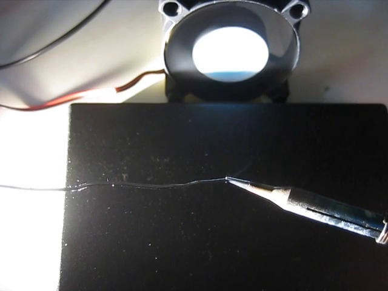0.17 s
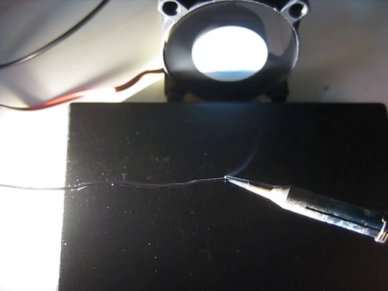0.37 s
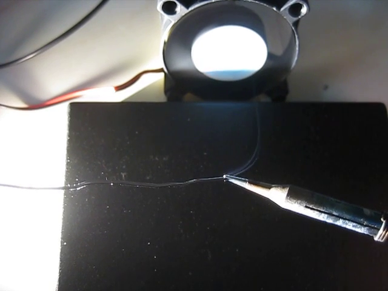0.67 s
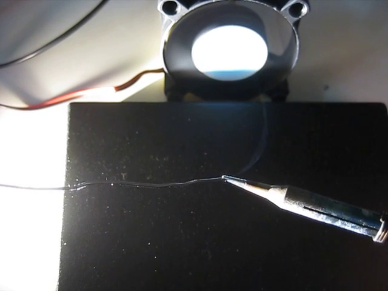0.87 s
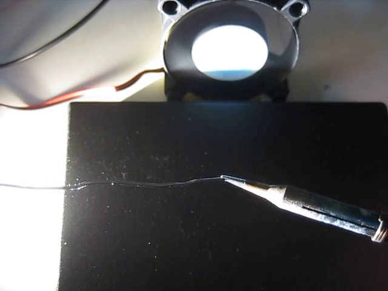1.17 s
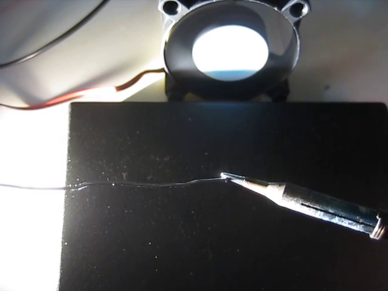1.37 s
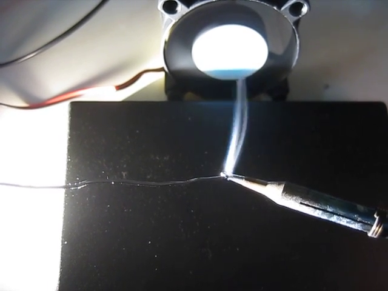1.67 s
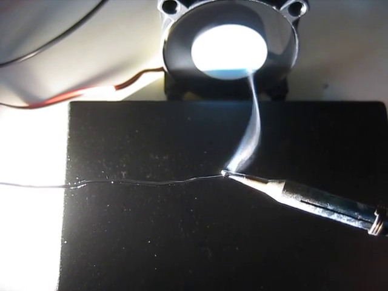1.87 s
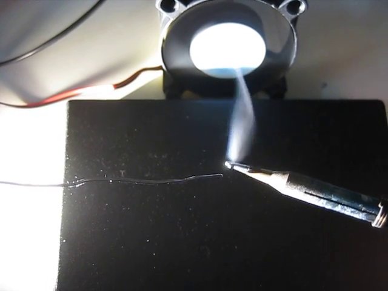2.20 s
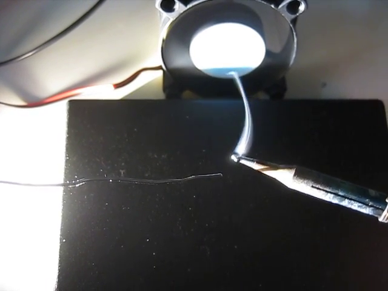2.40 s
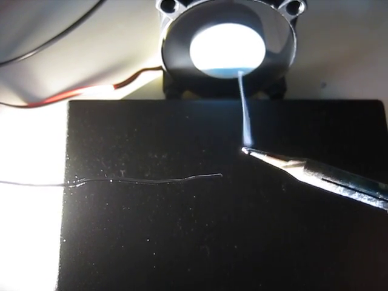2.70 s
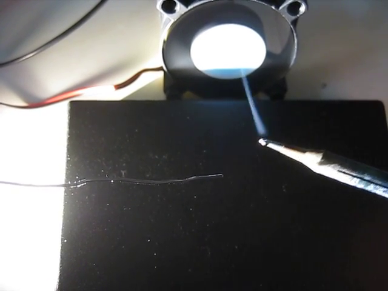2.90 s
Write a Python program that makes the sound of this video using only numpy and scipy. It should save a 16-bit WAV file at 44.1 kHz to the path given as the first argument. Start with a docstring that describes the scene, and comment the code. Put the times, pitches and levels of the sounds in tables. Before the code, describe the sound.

Steady whirring and rushing air from a small fan running close by.

```python
"""A small fume fan runs on a workbench, slowly gaining speed.
Its rotor sings on multiples of the turning rate. Air rushes through the frame, coloured by
its resonances and throbbing with the turns and the passing blades.
The microphone opens just after the start."""
import sys
import numpy as np
from scipy import signal
from scipy.fft import rfft, irfft
from scipy.io import wavfile
from scipy.ndimage import uniform_filter1d

SR = 44100
rng = np.random.default_rng(int(sys.argv[2]) if len(sys.argv) > 2 else 0)


def dump(signal):
    """Clip the signal to [-1, 1] and save it as 16-bit WAV at the path in sys.argv[1]."""
    limited = np.clip(np.atleast_2d(signal).T, -1, 1)
    pcm = np.round(limited * 32767).astype(np.int16)
    wavfile.write(sys.argv[1], SR, pcm)


N = 134505


def undb(db):
    """Decibels to gain."""
    return 10 ** (np.asarray(db) / 20)


def drift(rate_hz):
    """Smooth random drift, spread near 1."""
    hold = max(int(SR / rate_hz), 1)
    steps = np.repeat(rng.standard_normal(N // hold + 1), hold)
    return np.sqrt(np.e / 2) * uniform_filter1d(uniform_filter1d(steps, hold), hold)[:N]


def rotor_angle(t):
    """Rotor angle in rad: the speed creeps up ever faster and wanders slightly."""
    start_hz, rise_hz_per_s, bend_hz_per_s2 = 36.755, 0.012, 0.025
    turn_hz = start_hz + rise_hz_per_s * t + bend_hz_per_s2 * t ** 2
    wander = 1 + 0.00046 * drift(rate_hz=6.07)
    return 2 * np.pi * np.cumsum(turn_hz * wander) / SR


def locked_sine(angle, order):
    """Sine at a whole multiple (order) of the turning rate, random phase."""
    return np.sin(order * angle + rng.uniform(0, 2 * np.pi))


# rotor tones: order, starting rms level/dB, slope/(dB/s)
ROTOR_TONES = [(8, -61.5, -0.4), (9, -63.5, -0.5), (10, -56.5, -0.5), (11, -72.5, 1), (16, -59, 1.03),
               (18, -63.5, -3.5), (22, -55.5, 0.4), (24, -67, 2), (25, -58.5, -1.7), (27, -76.5, 3),
               (28, -65, 1), (29, -62, -4), (30, -76, 0), (32, -57.5, -1.5), (34, -54.5, 0), (35, -69, 2.5),
               (36, -65, -1.5), (44, -65.5, 0.4)]


def rotor_tones(t, angle):
    """Motor and blades sing on the turning rate; uneven inflow makes each tone waver."""
    tones = np.zeros(N)
    for order, start_db, slope_db_per_s in ROTOR_TONES:
        waver_db = 0.34 * drift(rate_hz=4.98)
        amplitude = np.sqrt(2) * undb(start_db + slope_db_per_s * t + waver_db)
        tones += amplitude * locked_sine(angle, order)
    return tones


# base spectrum of the air: f/Hz, density/(dB re 1/Hz)
AIR_SPECTRUM = [(30, -87), (100, -84), (250, -83), (600, -82), (950, -76), (1550, -76), (2560, -83),
                (3300, -85.5), (4400, -86.5), (5480, -92), (6700, -93), (10200, -101), (15600, -105)]
# resonances and hollows of frame and bench: f/Hz, width/Hz, gain/dB
FRAME_RESONANCES = [(412, 88, 2.5), (834, 88, 1), (1275, 120, 2), (1547, 100, -3.5), (2082, 500, 4.5),
                    (2397, 81, 4), (2923, 283, 8.5), (3530, 210, 4), (3950, 400, 5.5), (4960, 620, 6.5),
                    (5990, 520, 6), (8470, 420, 4.5), (9540, 540, 5), (10650, 420, 3.5), (11820, 500, 3.5),
                    (12950, 650, 4)]
# flow strength: t/s, level/dB
FLOW_LEVELS = [(0, 0.1), (.8, -0.08), (1.4, 0.6), (2.2, 0.06), (3.05, 0)]
# air throb: order, depth as a share of the amplitude
AIR_THROB = [(1, 0.046), (2, 0.024), (4, 0.03), (6, .09), (12, 0.028)]


def air_rush(t, angle):
    """Turbulence throbs with the rotor and sounds through the frame; the high hiss is smoother."""
    f = np.maximum(np.arange(N // 2 + 1) * SR / N, 1)
    air_hz, air_db = np.array(AIR_SPECTRUM).T
    colour_db = np.interp(np.log(f), np.log(air_hz), air_db)
    for centre_hz, width_hz, gain_db in FRAME_RESONANCES:
        colour_db += gain_db * 0.5 ** ((2 * (f - centre_hz) / width_hz) ** 2)
    flow_db = np.interp(t, *np.array(FLOW_LEVELS).T) + 0.44 * drift(rate_hz=5.05)
    noise = rng.standard_normal(N) * np.sqrt(SR / 2)  # unit power per Hz
    eddy_db = 0.5 * drift(rate_hz=90)
    turbulence = noise * undb(flow_db + eddy_db)
    throb = sum(depth * locked_sine(angle, order) for order, depth in AIR_THROB)
    corner_hz, hiss_share = 2800, 0.4
    throb_share = hiss_share + (1 - hiss_share) / (1 + (f / corner_hz) ** 4)
    spectrum = rfft(turbulence) + throb_share * rfft(turbulence * throb)
    return irfft(spectrum * undb(colour_db), N)


def scene():
    """The fan, close by, mono."""
    t = np.arange(N) / SR
    angle = rotor_angle(t)
    return (rotor_tones(t, angle) + air_rush(t, angle))[None]


def record(dry):
    """The microphone opens abruptly, has a narrow dead band in the treble and cuts the top."""
    open_s, ramp_s, closed_db = 0.0356, 0.002, -67
    notch_hz, notch_width_hz, top_hz = 7860, 1000, 15700
    t = np.arange(N) / SR
    gate = np.clip((t - open_s) / ramp_s, undb(closed_db), 1)
    notch = signal.iirnotch(notch_hz, notch_hz / notch_width_hz, fs=SR)
    lowpass = signal.ellip(12, 0.1, 70, top_hz, fs=SR, output="sos")
    return signal.sosfilt(lowpass, signal.lfilter(*notch, dry * gate))


dry = scene()
out = record(dry)
dump(out)
```